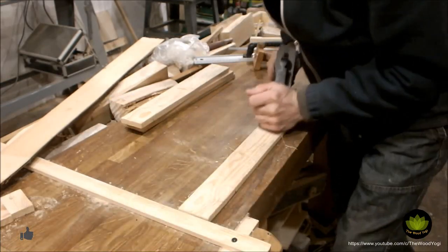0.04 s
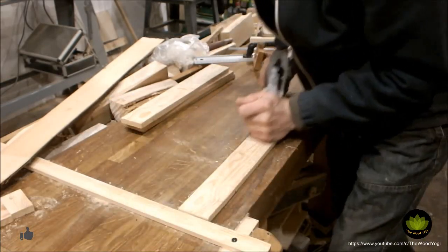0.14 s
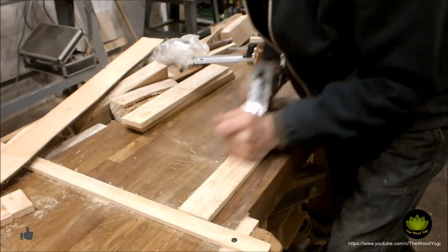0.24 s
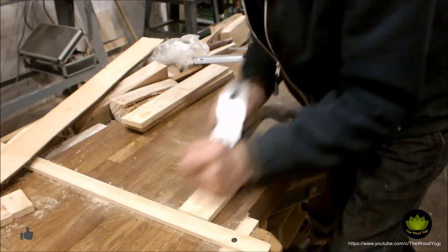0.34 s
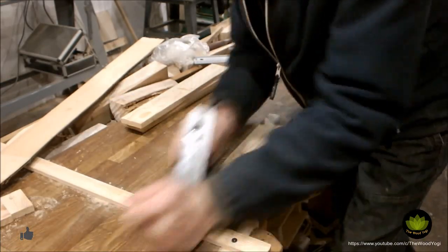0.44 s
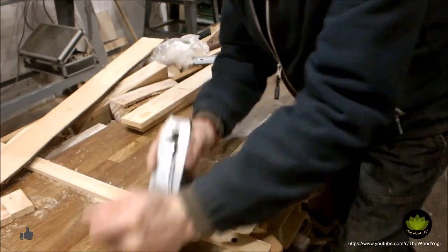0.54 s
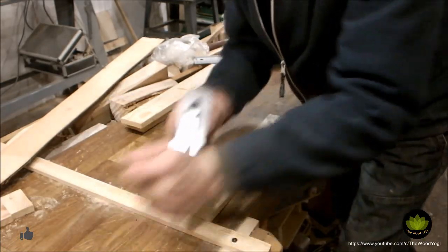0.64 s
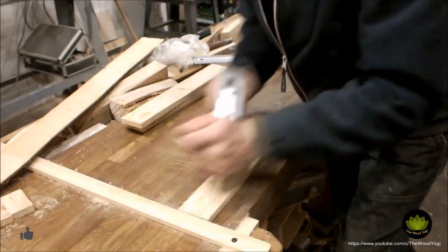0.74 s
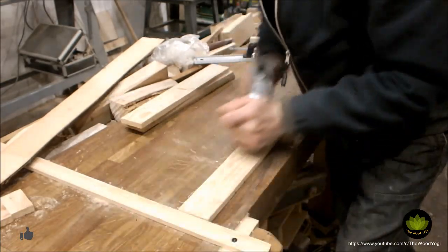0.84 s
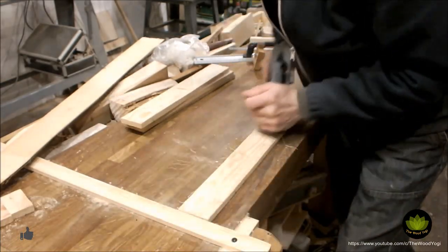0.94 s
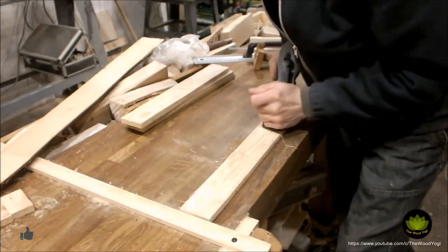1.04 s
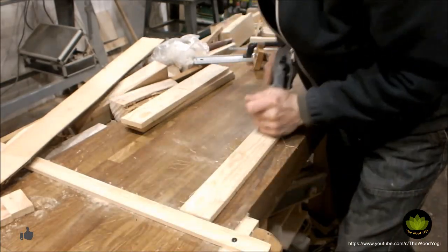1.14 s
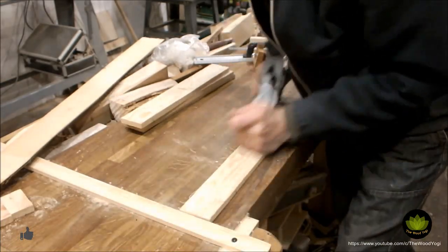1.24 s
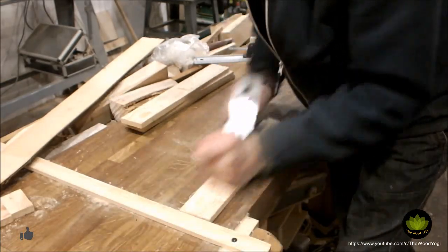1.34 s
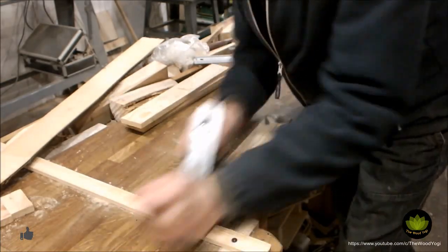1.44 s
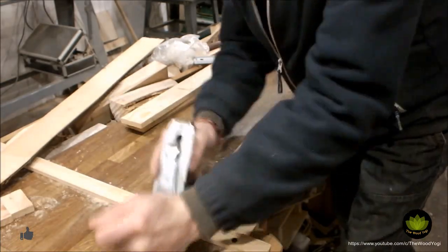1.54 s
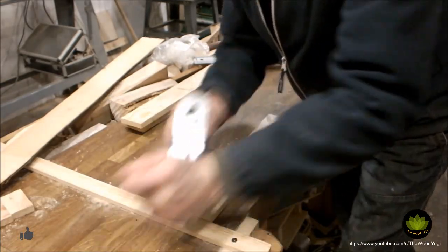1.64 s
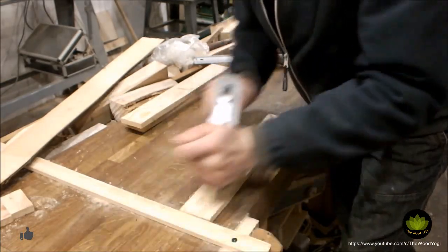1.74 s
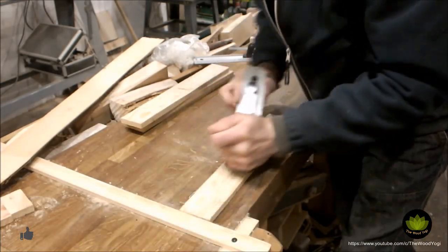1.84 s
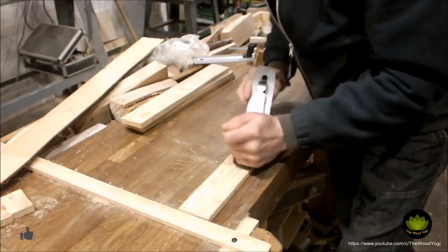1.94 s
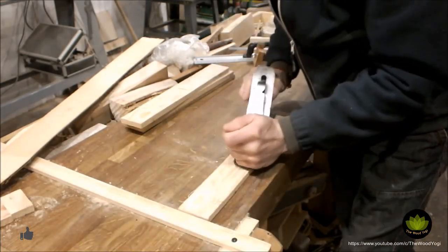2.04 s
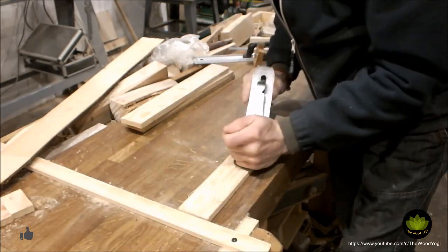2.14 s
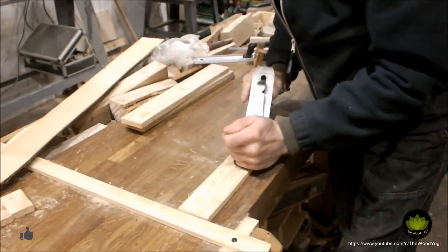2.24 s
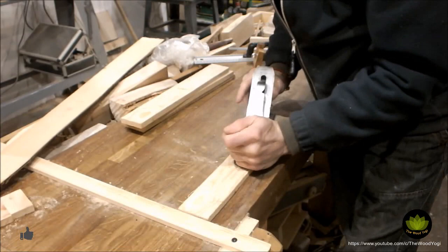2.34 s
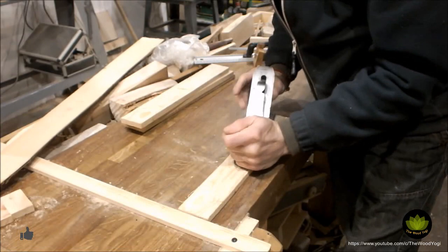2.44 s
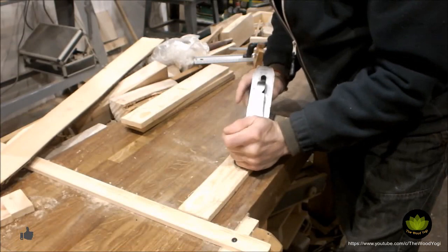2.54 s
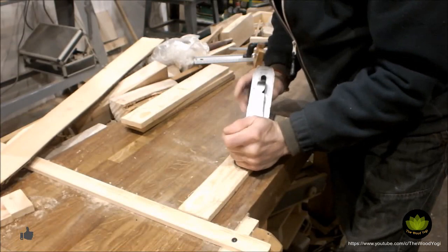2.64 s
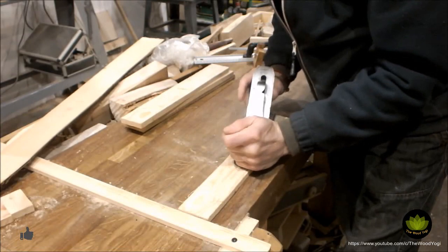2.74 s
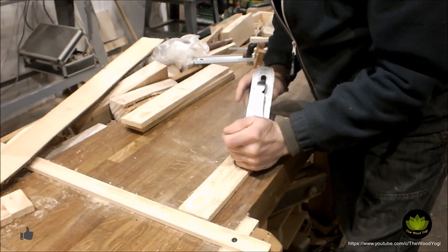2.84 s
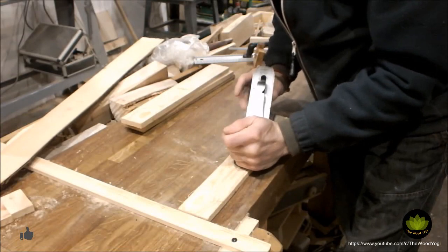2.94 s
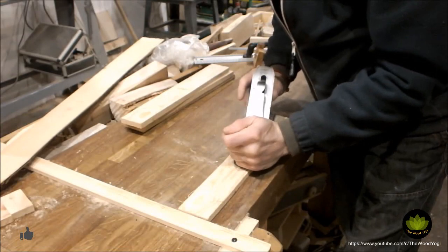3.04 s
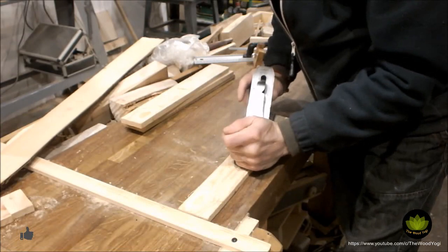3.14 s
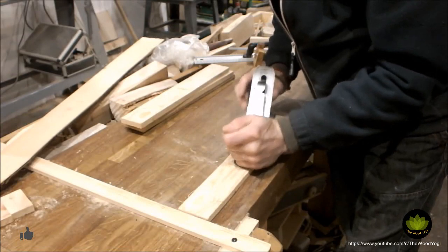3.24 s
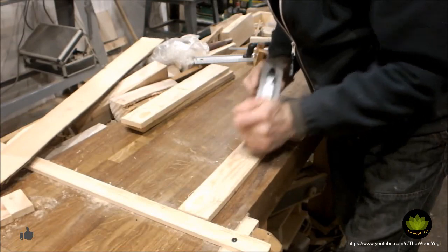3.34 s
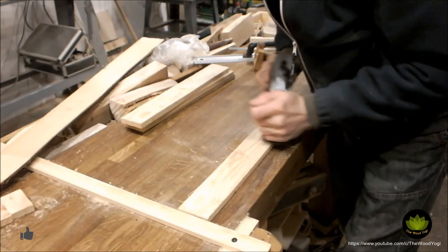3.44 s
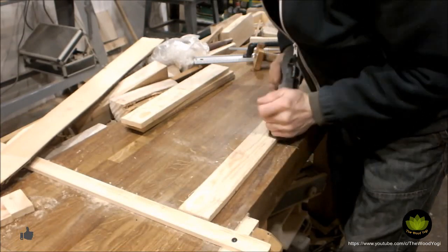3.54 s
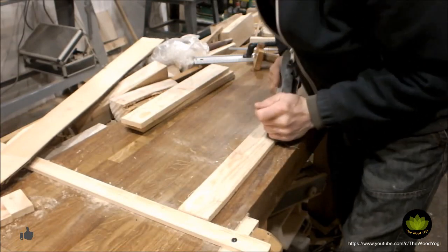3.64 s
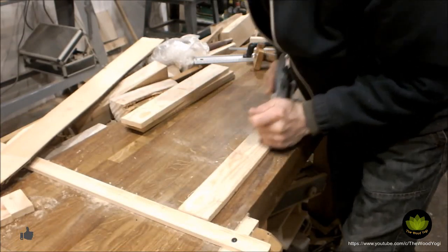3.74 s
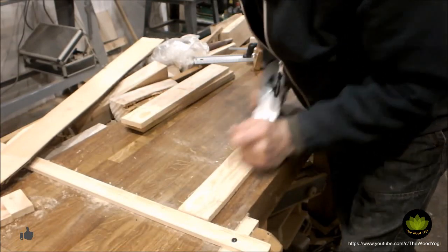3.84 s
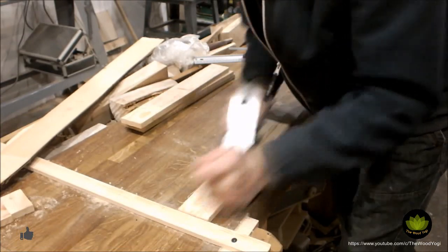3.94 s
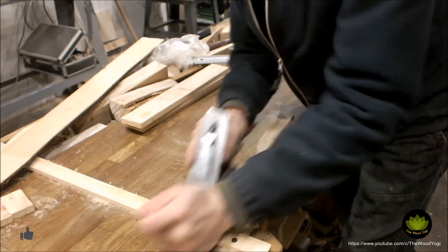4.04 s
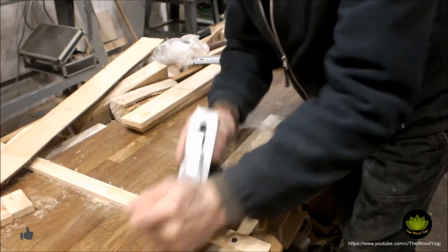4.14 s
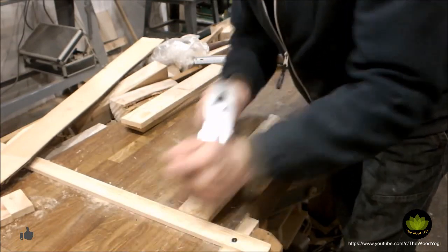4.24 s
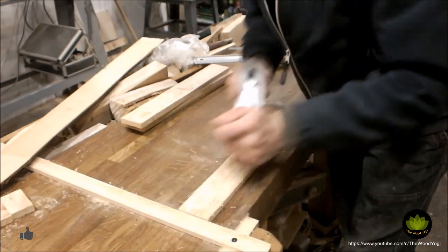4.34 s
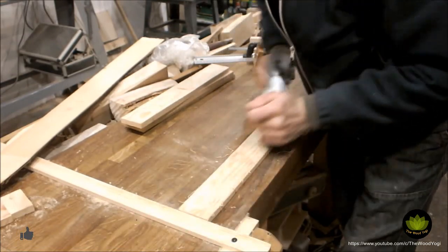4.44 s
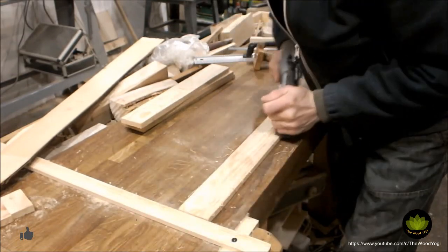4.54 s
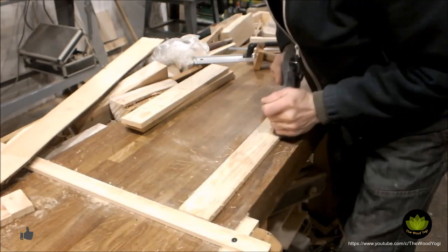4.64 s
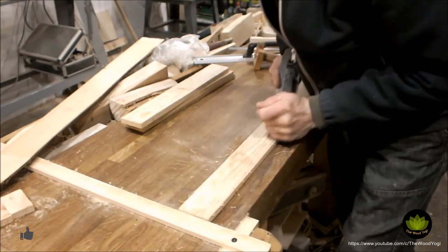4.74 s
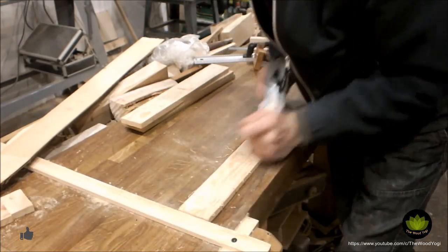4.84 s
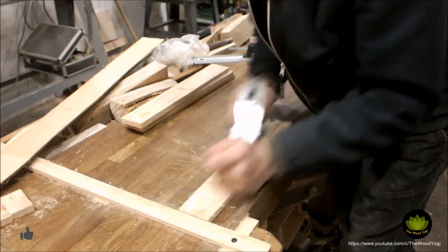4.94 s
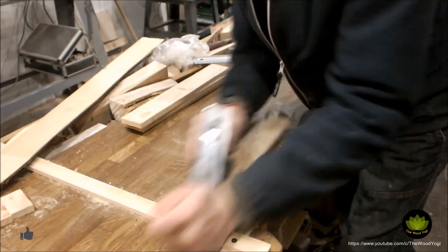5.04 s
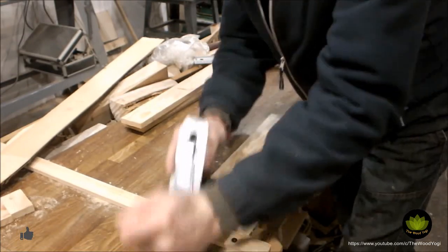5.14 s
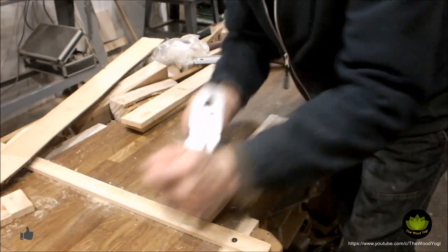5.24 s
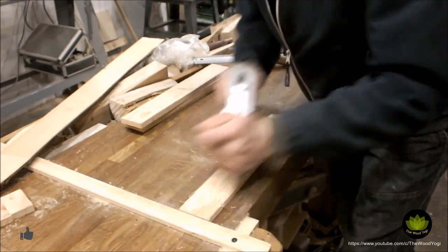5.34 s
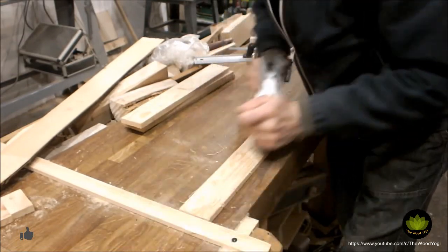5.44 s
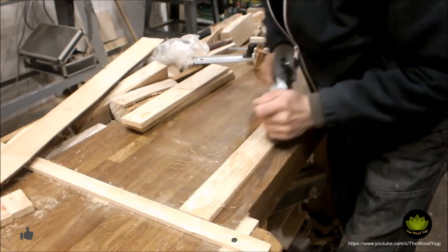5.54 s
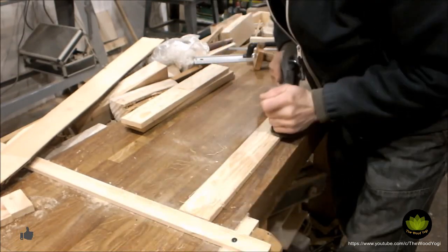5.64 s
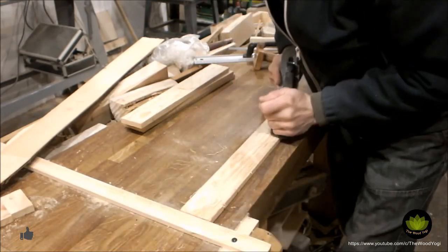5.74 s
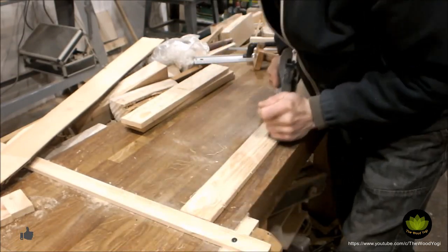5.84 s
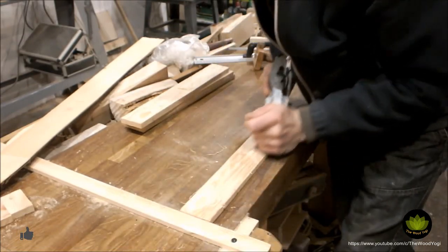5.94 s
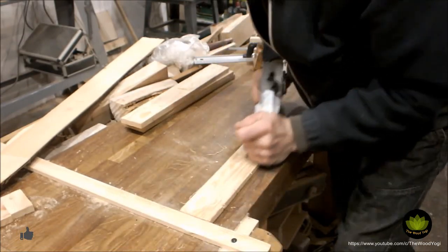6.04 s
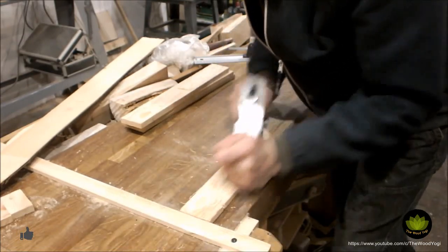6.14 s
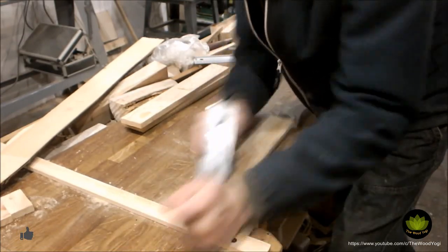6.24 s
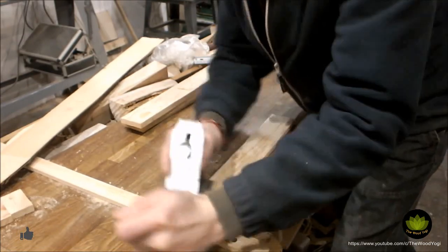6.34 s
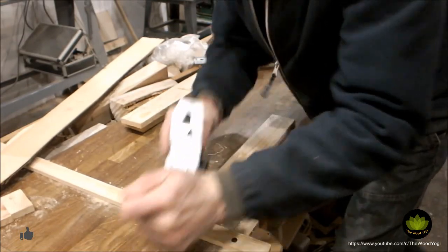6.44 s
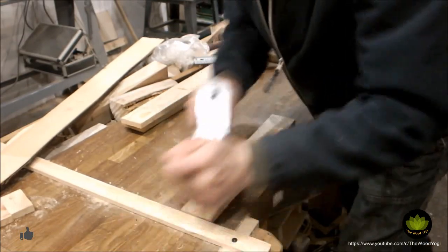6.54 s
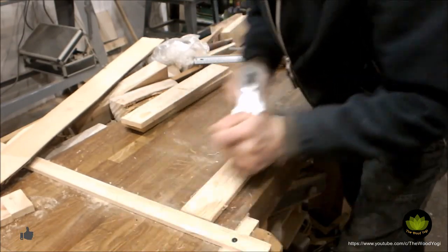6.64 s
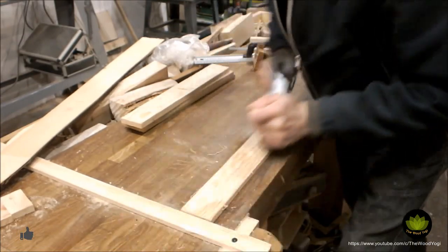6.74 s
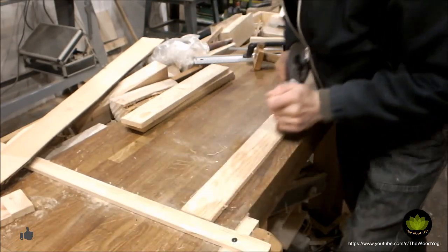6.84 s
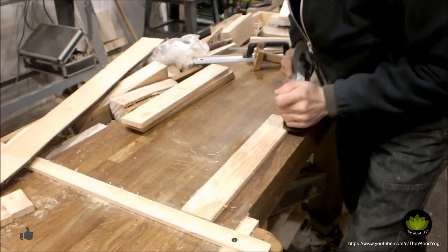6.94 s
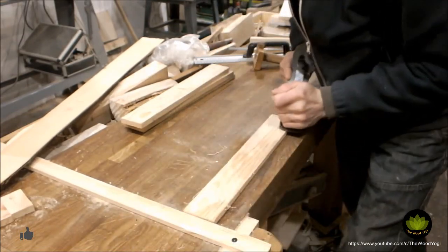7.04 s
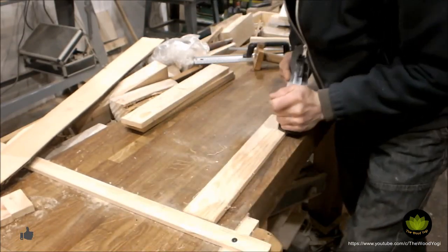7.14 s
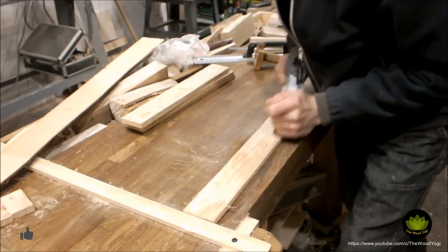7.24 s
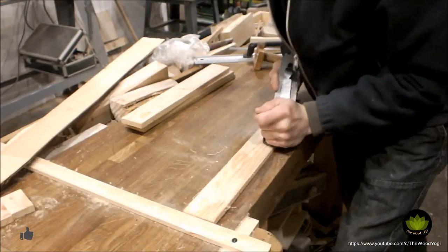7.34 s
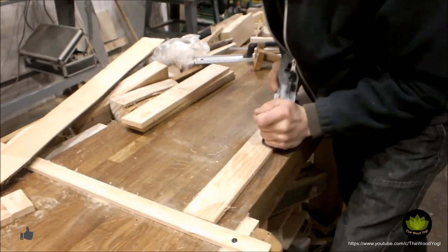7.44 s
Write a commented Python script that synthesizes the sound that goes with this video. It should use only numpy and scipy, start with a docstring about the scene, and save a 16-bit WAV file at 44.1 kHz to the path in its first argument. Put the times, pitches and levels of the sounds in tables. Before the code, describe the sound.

A steady quiet hiss with faint thin whistles fills a small, briefly reverberant workshop, heard close at the bench. From 0 to 0.5 s a plane rasps along a board, snagging on hard grain, then breaks out with a sharp knock. A clack at 1.0 s leads to a second rasp from 1.1 to 1.5 s. A soft brush and two knocks near 2 s follow, then near quiet until a hard double clack at 3.5 s. A groaning push runs 3.7 to 4.1 s, ending in a clatter; knocks at 4.6 s open a brighter, louder one to about 5.2 s. The sole drags back with thin broken ringing and a rising squeak around 5.3 to 5.7 s. The hardest landing, at 5.7 s, shudders the wood before a ringing stroke to 6.3 s. Light knocks and faint brushing precede a last short rasp at 7.2 to 7.5 s.

```python
"""A small workshop, a microphone pair at the bench: a metal plane is set down on a clamped board and pushed along it.
Stroke after stroke the iron tears fibres in a dense rasp: random snaps ring in iron and sole and snag at hard grain.
Pushes, and one hard landing, make board and bench groan: noise around a moving pitch, noise driving the bench modes.
Each landing is a short crack, with blows that ring the bench top. Once the sole is dragged back, ringing and squeaking.
A steady noise hiss with faint whistles lies under it all; the room adds a reverberant tail to the work."""
import sys
import numpy as np
from scipy import signal
from scipy.fft import rfft, irfft, next_fast_len
from scipy.io import wavfile

SR = 44100
rng = np.random.default_rng(int(sys.argv[2]) if len(sys.argv) > 2 else 0)


def persist_wave(psi):
    """Save psi, clipped to +-1, as 16-bit WAV."""
    counts = np.round(np.clip(psi, -1, 1) * 32767).astype(np.int16)
    wavfile.write(sys.argv[1], SR, np.atleast_2d(counts).T)


N = 330309

# resonances of iron and sole: (f/Hz, width/Hz, level/dB)
IRON_MODES = [(1632, 210, 6.5), (2157, 173, -6.5), (2956, 177, -1), (3350, 300, -1), (4240, 140, 1.5),
              (5610, 230, -3.5), (7310, 200, -4)]
# pushes up to the stall near the end of the board; the fifth entry, from 5.72 to 5.85 s, is no push:
# there the board shudders after the hard landing at 5.72 s: (t/s, rasp level/dB, groan of the board level/dB)
PUSHES_AND_SHUDDER = [
    [(.03, -56.5, -66), (.135, -40, -46), (.3, -39, -39), (.38, -37.5, -37.5), (.448, -43.5, -61)],
    [(1.1, -53, -91), (1.21, -37.5, -45.5), (1.33, -43.5, -35), (1.44, -38, -37.5), (1.466, -50, -50)],
    [(3.68, -59, -44.5), (3.75, -38.5, -45), (3.83, -35, -35), (3.98, -38.5, -32), (4.035, -44, -47)],
    [(4.665, -51, -77), (4.75, -46.5, -41), (4.8, -34, -43), (4.95, -23, -35.5), (5.0, -30.5, -41),
     (5.045, -45, -39.5)],
    [(5.72, -43.5, -20.5), (5.8, -45, -26), (5.85, -42, -26.5)],
    [(5.855, -41, -53), (5.92, -33.5, -35), (6.0, -39.5, -33), (6.08, -30.5, -31), (6.17, -28, -51),
     (6.2, -41.5, -52), (6.228, -44, -38)],
    [(7.15, -83, -68), (7.2, -49, -60), (7.235, -51, -56), (7.3, -30.5, -41.5), (7.33, -38, -29.5),
     (7.37, -62, -43), (7.41, -50.5, -51), (7.49, -40.5, -36)],
]
# the iron breaks out of the board end and the sole runs on:
# (t/s, break level/dB, break length/s, run-out level/dB, run-out length/s, groan level/dB)
BREAK_OUTS = [(0.452, -24, 0.02, -33, 0.066, -35), (1.469, -26, 0.016, -32.5, 0.058, -40),
              (4.04, -20, 0.023, -33.5, 0.1, -24.5), (5.056, -18, 0.024, -27, 0.15, -23),
              (6.229, -20, 0.024, -23.5, 0.11, -29)]


def from_db(db):
    """Level in dB to gain."""
    return 10 ** (np.asarray(db) / 20)


def rms_one(x):
    """Scale to an rms of 1."""
    return x / np.sqrt(np.mean(x ** 2) + 1e-20)


def in_time(rows):
    """Columns joined by straight lines; the first, a level in dB, comes as a gain, all but silent outside the rows."""
    s, level, *rest = np.transpose(rows)
    t = np.arange(N) / SR
    faded = np.interp(t, np.r_[s[0] - .02, s, s[-1] + .02], np.r_[-100, level, -100])
    return [from_db(faded)] + [np.interp(t, s, c) for c in rest]


def at_hz(points, hz):
    """Read a curve of (f/Hz, value) along log frequency."""
    f, value = np.transpose(points)
    return np.interp(np.log(hz), np.log(f), value)


def spectrum_hz(size):
    """Frequencies of the rfft bins, never below 1 Hz."""
    return np.maximum(np.arange(size // 2 + 1) * SR / size, 1)


def lowpass(x, order, top_hz):
    return signal.sosfilt(signal.butter(order, top_hz, fs=SR, output="sos"), x)


def band(x, low_hz, high_hz):
    return signal.sosfilt(signal.butter(2, [low_hz, high_hz], "band", fs=SR, output="sos"), x)


def drift(rate_hz):
    """Slow chance of spread 1: noise through two equal poles, made at every 40th sample and joined by lines."""
    r = np.exp(-80 * np.pi * rate_hz / SR)
    noise = rng.standard_normal(N // 40 + 2002)
    slow = signal.lfilter([1], [1, -2 * r, r * r], noise)[2000:]   # skip the filter's start
    return np.interp(np.arange(N) / 40, np.arange(len(slow)), rms_one(slow))


def resonance(x, hz, width):
    """A two-pole resonance of the given width in Hz; gain 1 on top."""
    r = np.exp(-np.pi * width / SR)
    poles = [1, -2 * r * np.cos(2 * np.pi * hz / SR), r * r]
    return signal.lfilter([(1 - r * r) / 2, 0, (r * r - 1) / 2], poles, x)


def gliding(x, hz, width):
    """A resonance whose centre follows hz in time: x is turned down to 0 Hz, smoothed and turned back up."""
    r = np.exp(-np.pi * width / SR)
    turn = np.exp(2j * np.pi * np.cumsum(hz) / SR)
    return 2 * np.real(signal.lfilter([1 - r], [1, -r], x / turn) * turn)


def ring(force, hz, t60):
    """A damped mode: a unit click sets a decaying sine of height 1 ringing, down 60 dB after t60 seconds."""
    r = from_db(-60 / (t60 * SR))
    w = 2 * np.pi * hz / SR
    return signal.lfilter([0, np.sin(w)], [1, -2 * r * np.cos(w), r * r], force + 1e-18)


def coloured_pair(pair, spectrum, likeness):
    """Two unrelated noises become left and right of the given colour and likeness; rms 1."""
    size = next_fast_len(N)
    hz = spectrum_hz(size)
    mid, side = rfft(pair, size) * from_db(at_hz(spectrum, hz))
    alike = np.clip(at_hz(likeness, hz), 0, 1)
    left_right = np.sqrt(1 + alike) * mid + np.sqrt(1 - alike) * side * [[1], [-1]]
    return rms_one(irfft(left_right, size)[:, :N])


def tearing(per_s, spread_db):
    """Fibres snap at random, a few much harder than the rest: sparse clicks of either sign; rms 1."""
    hardness_db = spread_db * np.minimum(rng.exponential(1, (2, N)), 5)
    sizes = from_db(hardness_db) * rng.choice([-1, 1], (2, N))
    return rms_one(sizes * (rng.random((2, N)) < per_s / SR))


def burst(s, level_db, length):
    """Quick rise, slower bell-shaped release; stops after 1 s at the latest."""
    out, first = np.zeros(N), int(s * SR)
    u = np.arange(min(SR, N - first)) / SR / (length + 0.0018)
    out[first:first + SR] = from_db(level_db) * (1 - np.exp(-3.5 * u)) * np.exp(-u * u)
    return out


def run_out(s, length):
    """Sags slowly while the sole slides on, then fades as the plane lifts."""
    slide_in_s, sag_db_per_s, lift_s = 0.047, 116, 0.036
    u = np.maximum(np.arange(N) / SR - s, 0)
    lifting = np.exp(-(np.maximum(u - length, 0) / lift_s) ** 2)
    return (1 - np.exp(-u / slide_in_s)) * from_db(-sag_db_per_s * u) * lifting


def colour_in_time():
    """Each push, or the shudder, keeps its colour until the next begins; the groan glides along it."""
    # colour of each push, the fifth row that of the shudder after the hard landing:
    # (sole ring level/dB re rasp, bright hiss level/dB re rasp,
    # low, middle and high ring of the iron level/dB, groan start f/Hz, groan end f/Hz, groan breadth [0-1])
    colours = [(-10.5, -9, 1, -7, -11, 330, 500, 0.53), (-5, -8.5, -5, -11, -8, 450, 400, 0.51),
               (-2.5, -5.5, 9, 1.5, 6.5, 900, 310, 0.61), (-11, -7, 9, 0, 3.5, 500, 690, 1),
               (8, -2, -7, -4, -20, 680, 600, 0.96), (-2.5, -4, 8, 7.5, 5, 300, 700, 0.03),
               (-2, -6, 0.5, 0, -0.5, 710, 430, 0.69)]
    spans = [(rows[0][0], rows[-1][0]) for rows in PUSHES_AND_SHUDDER]
    t = np.arange(N) / SR
    which = np.maximum(np.searchsorted([start for start, _ in spans], t) - 1, 0)
    start, end = np.transpose(spans)[:, which]
    table = np.transpose(colours)
    along = np.clip((t - start) / (end - start), 0, 1)
    first_hz, last_hz, breadth = table[5:, which]
    gains = from_db(table[:5])[:, which]
    return gains, first_hz + along * (last_hz - first_hz), np.clip(breadth, 0, 1)


def bench(deep, hollow):
    """The bench top rings: deep force drives the modes below 200 Hz, hollow force the rest."""
    # modes of the bench top: (f/Hz, level/dB, t60/s)
    bench_modes = [(161.2, 0, 0.21), (258.7, -14, 0.19), (329.3, 6, 0.084), (447.5, 3.5, 0.057),
                   (537, 1.5, 0.024), (623, 4, 0.039), (854, -17, 0.023)]
    return sum(from_db(db) * ring(deep if hz < 200 else hollow, hz, t60) for hz, db, t60 in bench_modes)


def hiss():
    """Steady background: coloured noise, and narrow resonances of it as a few faint whistles."""
    # colour of the hiss: (f/Hz, level/dB)
    hiss_colour = [(60, -2), (150, 1), (350, 3.5), (700, 2), (1660, -3), (4670, -4.5), (16000, -19)]
    # left-right likeness of the hiss: (f/Hz, likeness [0-1])
    hiss_likeness = [(60, 0.44), (4000, 0)]
    # faint steady whistles: (f/Hz, width/Hz, level/dB)
    whistles = [(2476, 120, 1), (13500, 40, -1)]
    level_db, left_minus_right_db = -53.5, -1.5
    noise = coloured_pair(rng.standard_normal((2, N)), hiss_colour, hiss_likeness)
    tones = sum(from_db(db) * resonance(noise, hz, width) for hz, width, db in whistles)
    return from_db(level_db + left_minus_right_db * np.array([[.5], [-.5]])) * (noise + tones)


def knocks():
    """A short crack of iron on wood; the blow rings the bench, and board and clamp clatter on for a while."""
    # the sole knocks on the board:
    # (t/s, crack level/dB, crack f/Hz, clatter level/dB, deep thud level/dB, hollow knock level/dB)
    landings = [(0.0, -52, 1420, -41.5, -29, -34), (.462, -7.5, 3100, -54, -33, -36.5),
                (1.0265, -4, 1800, -38, -18, -30), (1.477, -15, 2500, -58, -29.5, -44.5),
                (1.934, -18, 1500, -35.5, -21.5, -34.5), (2.003, -22, 2020, -48, -36, -44.5),
                (3.5031, -4, 3020, -24.5, -19.5, -21), (3.5071, -7, 770, -26, -46, -17.5),
                (4.078, -7.5, 1270, -24.5, -27.5, -55), (4.567, -11, 1590, -41, -27, -35),
                (4.672, -21, 940, -40, -41, -36.5), (5.151, -2, 2300, -26, -54, -32.5),
                (5.6746, -6.5, 2300, -53, -23, -19.5), (5.7179, 2.5, 1090, -20.5, -36, -26.5),
                (6.30, -14.5, 910, -25.5, -23, -24.5), (6.588, -58, 890, -50, -42, -47.5),
                (6.969, -30, 1860, -62, -26.5, -41), (7.045, -18.5, 1590, -60, -36, -38),
                (7.212, -25, 3330, -64, -58, -53), (7.419, -20.5, 1420, -41, -58, -47)]
    rattle_db = -27.5   # the clamp rattles the bench after each blow, re hollow knock
    clatter_top_hz = 4930   # the lingering clatter is duller than the crack
    crack, deep, hollow = np.zeros((3, N + SR))
    u = np.arange(int(.3 * SR)) / SR
    chance = rng.standard_normal((len(landings), 2, len(u)))
    thud = u * np.exp(-u / 0.00087)
    thud = thud / thud.sum()
    blow = np.exp(-u / 0.0002) * u / 0.00026 ** 2 / SR
    rattle_swell = np.sqrt(u / 0.013) * np.exp(-u / 0.022)
    for (s, crack_db, hz, clatter_db, deep_db, hollow_db), (noise, rattle) in zip(landings, chance):
        i = slice(round(s * SR), round(s * SR) + len(u))
        cycles = hz * u
        tick = 6 * cycles * np.exp(-3.0 * cycles) * np.sin(2 * np.pi * cycles)
        clatter = rms_one(band(band(noise, hz / 7.0, 4.8 * hz), hz / 12.0, 1.93 * hz))
        sharp = from_db(crack_db) * (tick + from_db(-12.5) * clatter * np.exp(-u / 0.0022))
        # the iron rings along with the lingering clatter
        iron = sum(from_db(db) * resonance(clatter, *mode) for *mode, db in IRON_MODES[:5])
        clatter = lowpass(clatter, 4, clatter_top_hz) + from_db(-18.5) * iron
        lingering = from_db(clatter_db) * rms_one(clatter) * np.exp(-u / 0.025)
        crack[i] += lowpass(sharp + lingering, 6, 2.67 * hz)   # little is left above this
        deep[i] += from_db(deep_db) * thud
        hollow[i] += from_db(hollow_db + rattle_db) * rattle * rattle_swell
        hollow[i] += from_db(hollow_db) * blow
    return crack[:N] + bench(deep[:N], hollow[:N])


def cut():
    """Torn fibres ring in iron and sole: sole ring, rasp and bright hiss, each a band with its own swells."""
    # the iron bites into hard grain: (t/s, level/dB, length/s)
    hard_grain = [(0.317, -26, 0.0072), (0.324, -21.5, 0.016), (1.28, -31.5, 0.017), (1.341, -28.5, 0.025),
                  (1.384, -32, 0.0085), (1.412, -31, 0.013), (3.829, -38, 0.025), (3.908, -26, 0.028),
                  (3.956, -41, 0.01), (4.113, -49, 0.0065), (5.099, -25, 0.015), (6.089, -35, 0.027),
                  (6.28, -43, 0.022)]
    # the sole brushes the board: (t/s, level/dB, length/s)
    sole_brushes = [(1.73, -52.5, 0.31), (6.762, -58, 0.62), (7.039, -44.5, 0.02)]
    # short bright hisses: the treble of a landing, a light brush, a tick: (t/s, level/dB, length/s)
    bright_hisses = [(1.03, -44, .003), (3.504, -22, 0.0023), (3.51, -37, .0015), (5.738, -36, 0.04),
                     (5.845, -24.5, 0.011), (6.717, -41, 0.0045), (7.01, -46.5, 0.019)]
    # colour of the torn fibres: (f/Hz, level/dB)
    fibre_colour = [(410, 12), (750, 3.5), (1600, -5.5), (4700, -3), (8000, 0), (16000, -5)]
    # left-right likeness of the rasp: (f/Hz, likeness [0-1])
    rasp_likeness = [(700, 0.61), (3770, 0.49), (15000, 0.49)]
    # borders of the low, middle and high rings: (f/Hz)
    ring_borders = [2500, 4000]
    ring_drift_db, ring_flicker_db = 2.5, 2.5
    ring_stray, ring_stray_hz = 0.015, 4   # share by which each ring strays in pitch, and how fast
    exit_sole_db, exit_hiss_db, run_out_sole_db = -13, -4.5, -2   # re rasp

    sole_gain, hiss_gain, *ring_gains = colour_in_time()[0]
    torn = coloured_pair(tearing(3500, spread_db=1.0), fibre_colour, rasp_likeness)
    sound = torn
    # pressure and grain shift, so each resonance comes, goes and strays on its own
    for hz, width, db in IRON_MODES:
        ring_db = db + ring_flicker_db * drift(25.0) + ring_drift_db * drift(12.5)
        gain = from_db(ring_db) * ring_gains[np.searchsorted(ring_borders, hz)]
        sound = sound + gain * gliding(torn, hz * (1 + ring_stray * drift(ring_stray_hz)), width)
    sound = sound * from_db(0.92 * drift(27) + 0.5 * drift(250))

    contact = sum(in_time(rows)[0] for rows in PUSHES_AND_SHUDDER)
    contact = contact + sum(burst(*row) for row in [*hard_grain, *sole_brushes])
    breaks = sum(burst(*row[:3]) for row in BREAK_OUTS)
    slide = sum(from_db(db) * run_out(s, length) for s, _, _, db, length, _ in BREAK_OUTS)
    sole = contact * sole_gain + breaks * from_db(exit_sole_db) + slide * from_db(run_out_sole_db)
    bright = contact * hiss_gain + breaks * from_db(exit_hiss_db)
    bright = bright + sum(burst(*row) for row in bright_hisses)
    # neighbouring bands meet in opposite phase, so the middle one is turned over
    rasp = -(contact + breaks + slide)
    # (gain, low f/Hz, high f/Hz, flicker/dB)
    layers = [(sole, 800, 2300, 1.5), (rasp, 2300, 4600, 1.5), (bright, 5400, 17000, 2.2)]
    # each layer flickers on its own
    return sum(gain * from_db(flicker_db * drift(18)) * rms_one(band(sound, low_hz, high_hz))
               for gain, low_hz, high_hz, flicker_db in layers)


def rumble():
    """The board groans at a pitch that glides, as its free length does under the plane, and shakes the bench modes."""
    level = sum(in_time(np.array(rows)[:, ::2])[0] for rows in PUSHES_AND_SHUDDER)
    level = level + sum(from_db(db) * run_out(s, length) for s, *_, length, db in BREAK_OUTS)
    _, hz, breadth = colour_in_time()
    groan_noise, shake = rng.standard_normal((2, N))
    narrow, wide = (rms_one(lowpass(groan_noise, 2, top_hz)) for top_hz in (55, 300))
    slow = (1 - breadth) * narrow + breadth * wide
    groan = slow * np.cos(2 * np.pi * np.cumsum(hz) / SR)   # a band of noise around the moving pitch
    force = level * shake
    shaken = bench(from_db(-3.5) * force, force) / np.std(bench(shake, shake))
    return level * groan + from_db(-8.5) * shaken


def drag():
    """The lifted sole skims the board and rings brokenly in its own modes; a rising squeak joins late and outlasts it."""
    # sole dragged back: (t/s, level/dB)
    drag_level = [(5.29, -50.5), (5.34, -69), (5.39, -58), (5.55, -49), (5.61, -49), (5.66, -59)]
    # free sole ringing: (f/Hz, width/Hz, level/dB)
    sole_modes = [(1210, 180, 1.5), (2360, 90, -14), (3880, 110, -3), (7400, 430, -5.5), (11940, 340, -7)]
    # squeak: (t/s, level/dB, length/s, first f/Hz, rise [Hz per s])
    s, squeak_db, length, first_hz, rise = (5.51, -47, 1.5, 1547, 2500)
    skim = tearing(5000, spread_db=2) * from_db(2.5 * drift(25))
    rings = 0
    for hz, width, db in sole_modes:
        mode = resonance(resonance(skim, hz, width), hz, width)
        rings = rings + from_db(db + 2.2 * drift(21.0)) * rms_one(mode)
    scrape = from_db(3.5) * rms_one(band(skim, 110, 1830))
    squeak_hz = first_hz + rise * np.clip(np.arange(N) / SR - s, 0, 2 * length)
    squeak = burst(s, squeak_db, length) * rms_one(gliding(skim, squeak_hz, 300))
    return in_time(drag_level)[0] * (rms_one(rings) + scrape) + squeak


def shop(x):
    """Reverberation: noise that dies at its own rate in each band, less alike left and right as pitch rises."""
    # reverberation of the workshop: (f/Hz, t60/s, level/dB)
    shop_decay = [(185, 0.38, -5.5), (482, 0.35, -1.5), (1320, 0.44, -10), (3550, 0.26, -13),
                  (10200, 0.34, -5.5)]
    u = np.arange(int(.6 * SR)) / SR
    tail = 0
    for hz, t60, db in shop_decay:
        noise = band(rng.standard_normal((2, len(u))), hz / 1.37, hz * 2.13)
        mid, side = noise * from_db(-60 * u / t60) * (u > .004)   # a short gap before the tail
        width = 2 * (hz * 2.57 - hz / 1.58) / SR   # weight by a share of the spectrum
        apart = np.clip(hz / 1500, 0, 1)
        scale = np.sqrt(width / np.sum(mid ** 2))
        tail = tail + from_db(db) * (mid + apart * side * [[1], [-1]]) * scale
    return signal.fftconvolve(x, tail, axes=1)[:, :N]


def microphone_lean(work):
    """The microphone pair faces the bench unevenly: left and right differ in level along the spectrum."""
    # microphone pair towards the bench: (f/Hz, left minus right level/dB)
    pair_lean = [(200, -2), (1650, -4.5), (4970, -4), (15000, 3)]
    size = next_fast_len(N)
    lean_db = at_hz(pair_lean, spectrum_hz(size)) * [[.5], [-.5]]
    return irfft(rfft(work, size) * from_db(lean_db), size)[:, :N]


def scene():
    """The work at the bench with its reverberation, over the steady hiss."""
    work = knocks() + cut() + rumble() + drag()
    work = work + shop(work.mean(axis=0)[None])
    # the work carries little deep bass
    work = signal.sosfilt(signal.butter(4, 128, "high", fs=SR, output="sos"), work)
    return microphone_lean(work) + hiss()


def record(dry):
    """The hardest peaks are rounded, the top is cut."""
    cutoff_hz = 16300
    return signal.sosfilt(signal.cheby2(14, 70, cutoff_hz, fs=SR, output="sos"), np.tanh(dry))


dry = scene()
out = record(dry)
persist_wave(out)
```